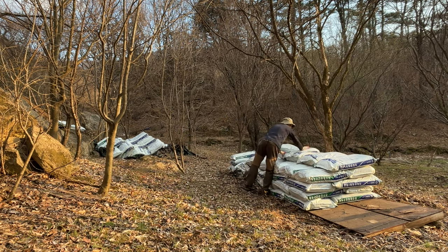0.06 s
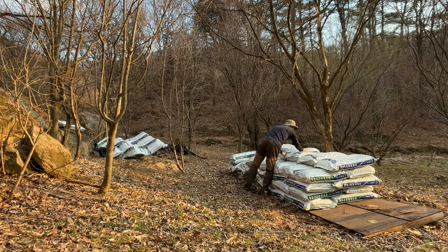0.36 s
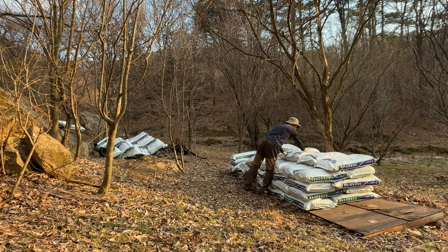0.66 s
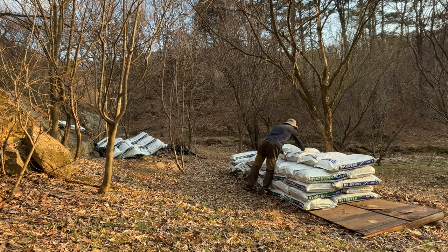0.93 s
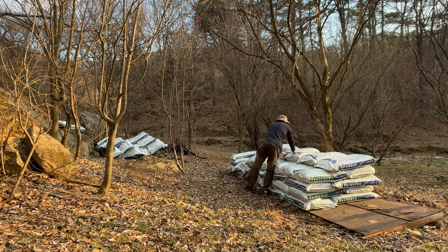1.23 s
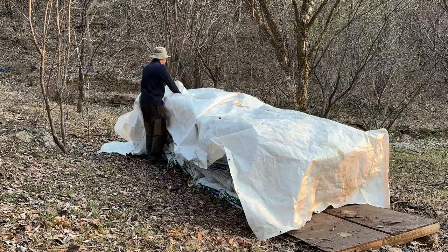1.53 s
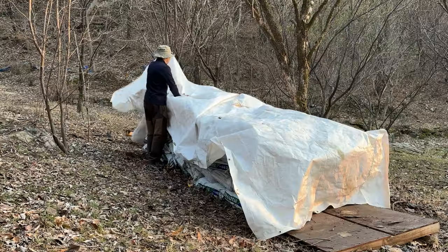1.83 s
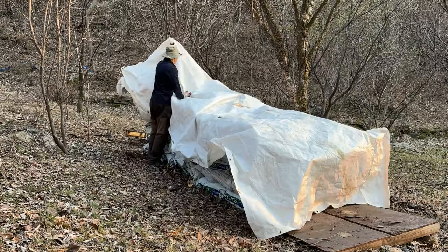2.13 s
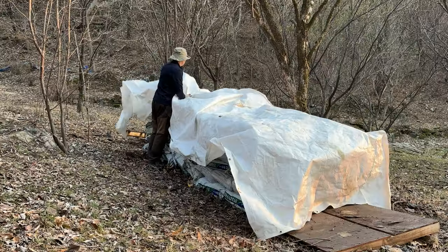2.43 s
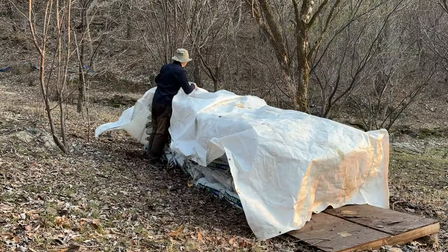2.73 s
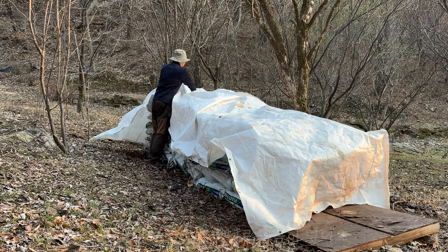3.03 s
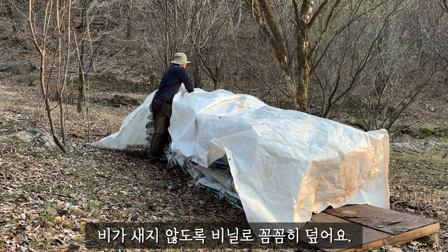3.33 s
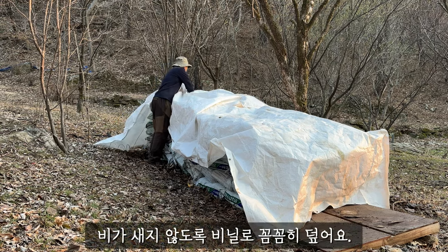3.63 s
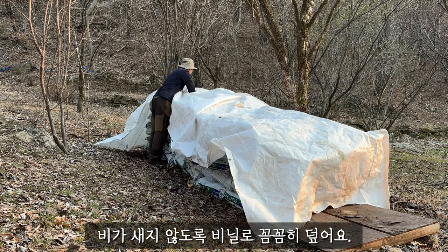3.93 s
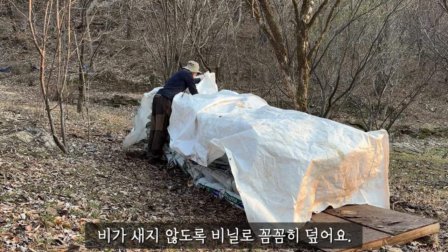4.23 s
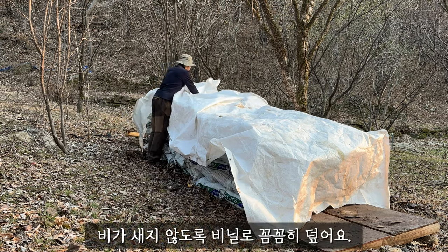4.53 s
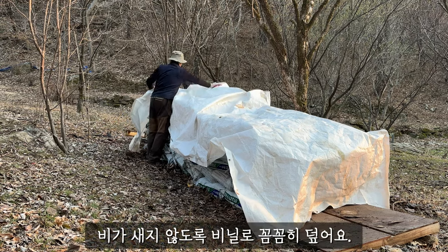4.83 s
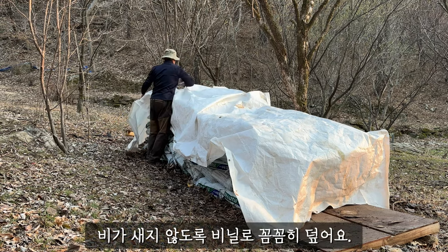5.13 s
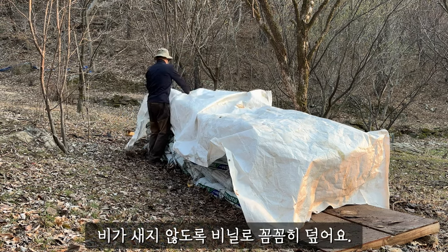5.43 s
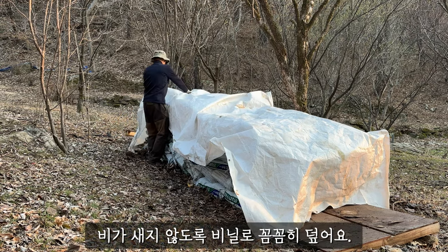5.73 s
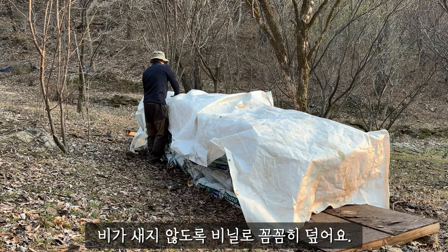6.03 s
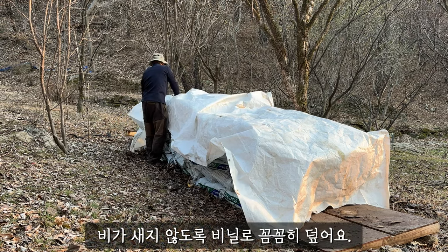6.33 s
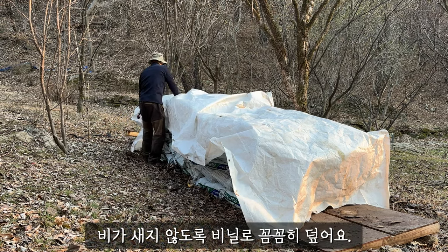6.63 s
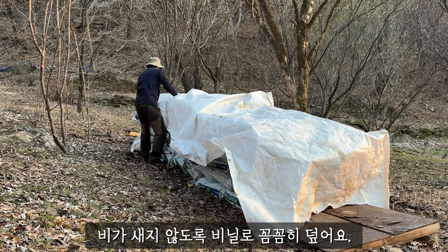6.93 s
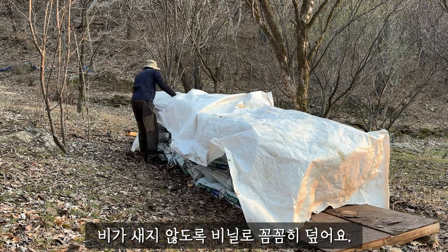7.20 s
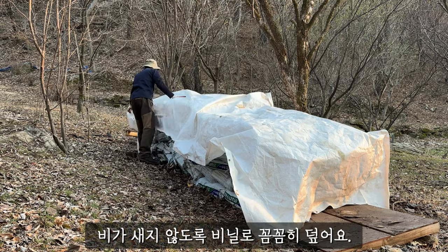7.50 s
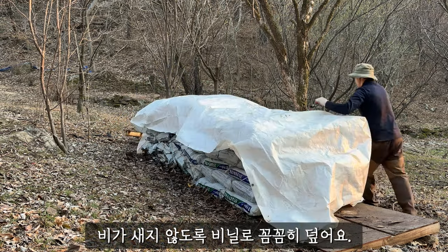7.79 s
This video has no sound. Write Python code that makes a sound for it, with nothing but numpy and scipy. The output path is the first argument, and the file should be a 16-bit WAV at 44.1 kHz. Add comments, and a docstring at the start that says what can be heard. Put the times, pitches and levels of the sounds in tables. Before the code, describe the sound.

For the first 1.5 seconds, someone shifts quietly beside a stack of plastic bags: light rubbing, soft low bumps, and small crunches and snaps of dry leaves and twigs. At 1.5 seconds the listening position changes abruptly and a large plastic sheet takes over, louder, crinkling in jerky swells as it is dragged and tucked. Folds pop, sliding plastic hisses, and slack panels billow and fall with soft thumps. Strong pulls come from about 1.8 to 2.5 seconds, with a smaller one near 3.1, then lighter rustling. More swells arrive around 4.0 to 4.3, 4.8, 5.3 to 5.6 and 6.3 seconds. A lull with scattered crackles lasts until 7.1, followed by a pull peaking near 7.5. The position shifts again at 7.8, with a last tug at 8 seconds. The sheet sounds fairly near, with faint reverberation from trees and a low, steady wash of air throughout.

```python
"""Outdoors among trees, someone shifts on dry leaves beside a stack of plastic bags, then drags and
tucks a big plastic sheet over it. Each pull buckles the film in countless small creases, makes loose
panels billow and draws a hiss from sliding friction; single folds snap through with a pop, and slack
plastic falls with a thump. The work is heard from three positions in turn, with faint reverberation
from the trees and a steady wash of air."""
import sys
import numpy as np
from scipy import signal
from scipy.fft import rfft, irfft, next_fast_len
from scipy.io import wavfile
from scipy.ndimage import uniform_filter1d

SR = 44100
rng = np.random.default_rng(int(sys.argv[2]) if len(sys.argv) > 2 else 0)


def generate_wav(sig):
    """Save sig (samples, or channels by samples) to the path in sys.argv[1] as 16-bit PCM at SR."""
    pcm = np.round(np.clip(np.atleast_2d(sig).T, -1, 1) * 32767).astype(np.int16)
    wavfile.write(sys.argv[1], SR, pcm)


N = 355278

# moments at which the second and third listening positions begin: start_s
MOVES_S = [1.503, 7.83]


def sheet():
    """Stick-slip: a slack sheet yields in jerks, which merge into an even swish under a hard pull."""
    crumple_db, edge_db, billow_db = pull_levels()
    density = np.clip(gain_of(.6 * (crumple_db + 33.5)), .16, 1)
    body, edge = crumpling(density, crumple_db, edge_db)
    slide = sliding(crumple_db)
    billow = billowing(billow_db)
    folds = flipping_folds(crumple_db)
    jerk = stick_slip(per_s=42, depth=2.2 * (1.35 - density), settle_s=.009)
    edge, slide = shifting_resonances(np.array([edge, slide]), depth_db=2.2, hold=4, frame=1024)
    return jerk * (body + jerk ** .55 * edge) + np.sqrt(jerk) * slide + billow + folds


def pull_levels():
    """Common excitation: each pull sets the dB envelopes of crumpling, its sharp edge and billowing."""
    # pulls and tucks: peak_s, rise_s, fall_s, crumple_db, sharpness_db, billow_db
    pulls = [(1.621, 0.047, 0.02, -42, -12, -39), (1.691, 0.032, 0.023, -39.5, -14, -40),
             (1.777, 0.083, 0.1, -35.5, -14, -36), (1.855, 0.039, 0.066, -35.5, -13, -37),
             (1.945, 0.066, 0.11, -34, -12.5, -38.5), (2.095, 0.13, 0.12, -35.5, -22, -36.5),
             (2.18, .05, 0.065, -41, -9, -44), (2.241, 0.031, 0.1, -29, -11, -37.5),
             (2.41, 0.27, 0.4, -39.5, -11.5, -41), (2.74, 0.056, 0.0078, -41.5, -7, -39.5),
             (2.829, 0.079, 0.037, -55, -19, -48), (2.975, 0.017, 0.043, -45, -5, -64),
             (3.064, 0.05, 0.13, -35.5, -10.5, -37), (3.281, 0.079, 0.082, -42, -10.5, -46),
             (3.386, 0.04, 0.032, -43, -8, -43), (3.57, 0.18, 0.15, -51, -15, -62),
             (3.71, 0.33, 0.46, -49.5, -10, -48.5), (3.971, 0.073, 0.08, -43, -17, -48),
             (4.071, 0.086, 0.17, -36, -8.5, -38.5), (4.14, 0.059, 0.13, -35.5, -26, -37.5),
             (4.249, 0.05, 0.095, -35, -7.5, -42.5), (4.308, 0.025, 0.044, -38, -14, -52),
             (4.39, 0.024, 0.056, -45.5, -17, -42.5), (4.469, 0.12, 0.19, -45.5, -9.5, -46.5),
             (4.68, 0.23, 0.065, -48, -6, -50), (4.821, 0.11, 0.091, -35.5, -7, -38.5),
             (5.02, 0.12, 0.077, -50.5, -6.5, -52.5), (5.156, 0.01, 0.025, -52, -9, -39),
             (5.35, 0.2, 0.19, -38, -8, -39), (5.512, 0.034, 0.077, -32.5, -7.5, -34.5),
             (5.718, 0.062, 0.074, -41.5, -12.5, -41.5), (5.821, 0.084, 0.044, -48.5, -8, -49),
             (6.0, 0.0087, 0.022, -50, -39, -50), (6.048, 0.022, 0.045, -45, -4.5, -44.5),
             (6.135, 0.045, 0.12, -44, -10, -50), (6.28, 0.018, 0.0594, -29.5, -7.5, -43),
             (6.308, 0.049, 0.043, -33, -9, -33), (6.375, 0.073, 0.032, -37.5, -8.5, -33.5),
             (6.52, 0.22, 0.043, -53.5, -23, -52), (6.921, 0.088, 0.73, -54.5, -11.5, -51),
             (7.135, 0.035, 0.047, -40, -9.5, -42), (7.207, 0.033, 0.038, -41.5, -8, -46),
             (7.295, 0.036, 0.035, -42, -10, -40), (7.362, 0.053, 0.043, -35, -12, -40.5),
             (7.452, 0.061, 0.08, -31.5, -14, -33.5), (7.54, 0.045, 0.16, -63, -3, -52),
             (7.84, 0.013, 0.025, -41.5, -23, -39.5), (7.88, 0.073, 0.036, -43.5, -12, -40.5),
             (7.977, 0.037, 0.03, -29, -12.5, -34.5)]
    peak_s, rise_s, fall_s, crumple_db, sharpness_db, billow_db = np.transpose(pulls)
    crumple = swells(peak_s, rise_s, fall_s, crumple_db, rest_db=-69.5)
    edge = swells(peak_s, rise_s, fall_s, crumple_db + sharpness_db, rest_db=-100)
    # loose panels move a little after the creases and settle more slowly
    billow = swells(peak_s + .0062, rise_s, fall_s * 1.22, billow_db)
    return crumple, edge, billow


def crumpling(density, crumple_db, edge_db):
    """Buckling creases radiate clicks over the swish of the film; gives a dull body and a sharp edge."""
    # dull crinkling, strongest near 950 Hz, with a filter notch at 10 kHz: frequency_hz, gain_db
    crinkle_filter = [(100, -29), (260, 0), (470, -4), (700, 1.1), (950, 3.5), (1400, -1), (2200, -6),
                      (3200, -13.5), (5000, -21), (7000, -21.5), (10000, -135), (15000, -47)]
    creases = buckling(density, spread_db=-.5, pitch_hz=(371, 5240), cycles=.36, lag_s=.005, count=18000)
    swish = rng.standard_normal((2, N))
    blends = np.array([creases + gain_of(-3) * swish, creases + swish])
    dull, sharp = colour(shifting_resonances(blends, depth_db=2.6, hold=6), crinkle_filter)
    dull = filtered(dull, lambda hz: rolloff(hz, corner_hz=2500, order=6))
    sharp = filtered(sharp, lambda hz: 1 - rolloff(hz, corner_hz=2500, order=6))
    body = gain_of(crumple_db - .32) * steadied(dull, band_hz=(400, 2500), window=1000)
    edge = gain_of(edge_db) * steadied(sharp, band_hz=(2500, 6000), window=1000)
    return body, edge


def buckling(density, spread_db, pitch_hz, cycles, lag_s, count):
    """Elastic instability: creases give way in avalanches of four damped pulses; (direct, scattered)."""
    when, chance, pitch, size, damping = rng.random((count, 5)).T
    lags = rng.exponential(1, (2, 4, count))
    kicks = rng.standard_normal((2, 4, count))
    lags[:, 0], kicks[:, 0] = 0, 2 * np.sign(kicks[:, 0])  # a firm first buckle sets off the others
    onset = (when * N).astype(int)
    live = chance < (density * np.ones(N))[onset]
    size = gain_of(spread_db * np.minimum(-np.log(1 - size), 3))[live]
    low_hz, high_hz = pitch_hz
    hz = low_hz * (high_hz / low_hz) ** pitch[live]
    step = np.arange(200)
    turns = hz[:, None] * step / SR
    age = turns / (cycles * (.5 + damping[live]))[:, None]
    swing = np.sin(2 * np.pi * turns) * age * np.exp(-age) * (1 - step / len(step))
    clicks = np.zeros((2, N))
    for row in range(2):
        for lag, kick in zip(lags[row][:, live], kicks[row][:, live]):
            places = (onset[live] + (lag * lag_s * SR).astype(int))[:, None] + step
            pulses = swing * (size * hz * kick * np.exp(-lag / 2))[:, None]
            clicks[row] += np.bincount(places.ravel(), pulses.ravel(), N)[:N]
    # whitened over their range, so that later filters alone set the colour
    length = next_fast_len(N, real=True)
    spectrum = rfft(clicks, length)
    power = uniform_filter1d(abs(spectrum) ** 2, size=1000)
    return irfft(spectrum * np.sqrt(N / (power + power.max() / 20)), length)[:, :N]


def flipping_folds(crumple_db, small_count=70):
    """Bistable folds flip over: big ones at set times, small ones at random, scaled by the crumpling."""
    # big folds of the sheet: start_s, ring_db, pitch_hz, crack_db, tick_db
    big_folds = [(1.671, -29, 1240, -31, -37), (1.764, -32, 1230, -40, -55), (1.928, -21, 824, -28, -33),
                 (1.941, -29, 1050, -28, -49), (1.975, -27, 850, -42, -55), (2.016, -21, 730, -26, -30),
                 (2.021, -32, 710, -20, -45), (2.029, -24, 704, -24, -44), (2.0645, -16.5, 980, -17, -22),
                 (2.233, -20, 1520, -20.5, -38), (2.248, -18.5, 730, -22, -49), (2.276, -30, 825, -29, -26),
                 (2.365, -32, 1800, -28, -55), (2.404, -17, 1675, -21.5, -57), (2.464, -24, 1080, -40, -54),
                 (2.483, -21.5, 930, -38, -52), (2.678, -26, 1090, -27, -31), (2.738, -28, 1270, -36, -48),
                 (2.784, -32, 1960, -52, -64.5), (2.823, -28, 1090, -36.5, -54),
                 (2.927, -46, 696, -47, -28.5), (2.95, -26, 2060, -32, -56), (2.996, -38, 790, -30, -32),
                 (3.014, -35, 657, -27, -55), (3.037, -20, 1850, -25, -52), (3.351, -29, 790, -29.5, -31),
                 (3.385, -26, 1020, -36, -56), (3.558, -27, 1750, -32, -54),
                 (3.784, -36.5, 670, -55, -32.5), (3.91, -27.5, 897, -60, -70), (4.04, -26, 830, -30, -50),
                 (4.069, -28, 950, -37, -47), (4.127, -20, 915, -22.5, -48), (4.186, -20, 930, -28.5, -47),
                 (4.241, -16, 794, -27, -53), (4.262, -25, 950, -28, -51), (4.301, -19, 970, -39, -56),
                 (4.392, -27, 883, -41, -60), (4.46, -19.5, 890, -47, -56), (4.496, -42, 845, -44, -32.5),
                 (4.647, -40, 1500, -34, -55), (4.696, -38, 1500, -29, -52), (4.822, -30, 830, -26, -55),
                 (4.887, -22, 1600, -35, -52), (5.04, -31.5, 1470, -36, -68), (5.143, -24.5, 960, -48, -67),
                 (5.215, -42, 875, -47, -58), (5.299, -32, 1050, -31, -37), (5.343, -18, 1030, -33, -50),
                 (5.393, -20, 2070, -43, -52), (5.493, -17, 990, -22, -46), (5.524, -13, 1205, -35, -53),
                 (5.623, -25.5, 2100, -40, -56), (5.718, -23.5, 990, -34, -52),
                 (5.726, -25, 1500, -28.5, -57), (5.841, -31, 1600, -60, -52), (6.031, -27, 1240, -39, -44),
                 (6.147, -26, 1537, -56, -57), (6.273, -16.5, 1180, -43, -35),
                 (6.305, -14, 1310, -22.5, -28), (6.316, -19, 448, -36, -52), (6.394, -24, 970, -38, -53),
                 (6.469, -35, 1180, -36, -58), (6.478, -42, 1150, -36.5, -56), (6.708, -31, 1070, -43, -59),
                 (6.875, -30.5, 1500, -40, -65), (6.903, -31, 970, -51, -67), (6.908, -32, 1510, -47, -60),
                 (6.953, -42, 1010, -52, -63), (6.992, -31, 1030, -45, -63), (7.037, -24.5, 1350, -45, -60),
                 (7.061, -34, 1180, -38, -53), (7.081, -20.5, 1200, -36, -53), (7.123, -27, 980, -30, -62),
                 (7.187, -26, 1100, -39, -58), (7.2, -23, 1160, -49, -58), (7.323, -33, 1690, -28, -48),
                 (7.442, -17, 1320, -33, -54), (7.832, -28, 720, -61, -50), (7.84, -32, 1300, -32, -35),
                 (7.938, -26, 650, -50, -46), (7.954, -30, 664, -40, -29), (7.973, -15.5, 636, -27, -54),
                 (8.032, -23, 790, -59, -66)]
    progress = (np.arange(small_count) + rng.random(small_count)) / small_count
    start_s = MOVES_S[0] + (N / SR - MOVES_S[0]) * progress
    strength, pitch = rng.standard_normal((small_count, 2)).T
    level_db = np.minimum(crumple_db[(start_s * SR).astype(int)], -40) - 2 * strength
    pitch_hz = 1150 * 2 ** (.427 * pitch)
    small_folds = np.transpose([start_s, level_db + 7, pitch_hz, level_db + 3, level_db - 12])
    return snap_through(np.vstack([big_folds, small_folds]), ring_gain_db=-7.5, after_db=-10,
                        after_t60=.063, crack_gain_db=2, crack_t60=.019, tick_gain_db=5.5, tick_t60=.006)


def snap_through(events, ring_gain_db, after_db, after_t60, crack_gain_db, crack_t60,
                 tick_gain_db, tick_t60):
    """Snap-through excites damped modes, a weak after-ring, a crack, a tick and a settling rustle."""
    # heavily damped modes of a flipping panel: pitch_ratio, level_db
    panel_modes = [(.7, -14.5), (1, -1.5), (1.7, -6)]
    # spectrum of the crack: frequency_hz, gain_db
    crack_spectrum = [(400, -10), (1200, -8), (2500, -5), (4500, -7), (6500, -10), (9000, -38),
                      (13000, -30)]
    # spectrum of the bright tick: frequency_hz, gain_db
    tick_spectrum = [(3000, -8), (6500, -34), (9000, -3), (12500, -10.5), (16000, -18)]
    rings, cracks, ticks = np.zeros((3, 2, N))
    t = np.arange(7000) / SR
    rustle = gain_of(-12) * damped(t, t60=.33)
    after_ring = gain_of(after_db) * damped(t, after_t60)
    crack_shape = gain_of(crack_gain_db) * (damped(t, crack_t60) + rustle)
    tick_shape = gain_of(tick_gain_db) * (damped(t, tick_t60) + .47 * rustle)
    ratio, mode_db = np.transpose(panel_modes)[:, :, None]
    for start_s, ring_db, pitch_hz, crack_db, tick_db in events:
        for row in range(2):
            mode_hz = pitch_hz * ratio * (1 + .1 * rng.standard_normal(ratio.shape))
            age = mode_hz * t / .85  # a flip reaches its height in 0.85 cycles
            envelope = age * np.exp(1 - age) + np.minimum(age, 1) * after_ring
            swings = envelope * np.sin(2 * np.pi * (mode_hz * t + rng.random(ratio.shape)))
            add(rings[row], start_s, (gain_of(ring_db + ring_gain_db + mode_db) * swings).sum(0))
            add(cracks[row], start_s, gain_of(crack_db) * crack_shape * rng.standard_normal(len(t)))
            add(ticks[row], start_s, gain_of(tick_db) * tick_shape * rng.standard_normal(len(t)))
    return rings + colour(cracks, crack_spectrum) + colour(ticks, tick_spectrum)


def billowing(billow_db):
    """Large loose panels displace air slowly and so radiate low-frequency noise."""
    # spectrum of the billowing: frequency_hz, gain_db
    billow_spectrum = [(20, -32), (38, -11), (58, 1), (85, -1.5), (125, 0.5), (175, -1.5), (225, -8.5),
                       (330, -7), (600, -17), (2000, -65)]
    rumble = colour(rng.standard_normal((2, N)), billow_spectrum)
    return gain_of(billow_db - .34) * steadied(rumble, band_hz=(40, 300), window=1400)


def sliding(crumple_db):
    """Sliding friction of film on film hisses with every pull and in separate slips."""
    # slips of film over film: peak_s, rise_s, fall_s, level_db
    slips = [(1.72, 0.16, 0.14, -56), (2.57, 0.091, 0.32, -62.5), (2.93, 0.015, 0.013, -56),
             (3.37, 0.043, 0.18, -60.5), (3.8, 0.012, 0.025, -56), (4.08, 0.054, 0.19, -47.5),
             (4.79, 0.24, 0.04, -57.5), (4.95, 0.11, 0.11, -66), (5.32, 0.021, 0.063, -54.5),
             (5.57, 0.12, .08, -53.5), (5.78, 0.12, 0.087, -57.5), (6.53, 0.057, 0.2, -55.5),
             (6.67, 0.043, 0.07, -56.5), (6.76, 0.033, 0.09, -55.5), (6.83, 0.018, 0.046, -55),
             (7.42, 0.31, 0.25, -56)]
    # bright, broad sliding hiss, with a narrow filter notch at 8.2 kHz: frequency_hz, gain_db
    hiss_filter = [(600, 7.5), (2200, 5.5), (3200, 5), (4500, 3.5), (7000, 13), (8200, -64), (9200, 10),
                   (10200, 7), (12000, 7), (14000, 3), (15700, -0.5)]
    drag = gain_of(-32 + .74 * crumple_db)
    slip = gain_of(swells(*np.transpose(slips)))
    hiss = colour(friction(grit_db=1.5, window=60), hiss_filter)
    return gain_of(1.5) * np.hypot(drag, slip) * steadied(hiss, band_hz=(10500, 15500), window=1500)


def thumps(gain_db, cycles):
    """Air displacement: slack plastic falls on the stack and radiates a short, low wave packet."""
    # falls of slack plastic: peak_s, level_db, pitch_hz
    falls = [(.016, -53, 317), (.207, -41, 387), (.894, -43, 298), (1.409, -46, 292), (1.755, -34, 61.7),
             (1.89, -35, 55), (1.958, -26.5, 137), (2.072, -33, 117), (2.246, -26, 150), (2.393, -28, 104),
             (2.478, -30, 116), (3.072, -31, 111), (3.537, -32.5, 176), (4.119, -27, 105),
             (4.223, -26, 85.5), (4.329, -29, 94), (5.433, -29, 118), (5.477, -32, 124), (5.856, -35, 65.6),
             (6.079, -33, 138), (7.372, -27, 143), (7.54, -33, 107), (7.888, -31.5, 118)]
    pair = np.zeros((2, N))
    for peak_s, level_db, pitch_hz in falls:
        turns = np.arange(-3, 3, pitch_hz / (cycles * SR)) * cycles
        envelope = gain_of(level_db + gain_db) * np.exp(-(turns / cycles) ** 2)
        for row in pair:
            add(row, peak_s + turns[0] / pitch_hz, envelope * np.sin(2 * np.pi * (turns + rng.random())))
    return pair


def shuffle():
    """Friction and buckling: bags rub, leaves crunch underfoot, and single pieces snap."""
    # movements beside the bags: peak_s, rise_s, fall_s, rub_db, crunch_db
    movements = [(.08, 0.17, 0.33, -51.5, -63.5), (.21, 0.028, 0.06, -46, -57),
                 (.39, 0.14, 0.11, -58, -56.5), (.49, 0.064, 0.039, -49.5, -60.5),
                 (.565, 0.023, 0.034, -43, -76), (.75, .015, 0.041, -58, -64.5),
                 (.89, 0.15, 0.1, -52.5, -66.5), (1.088, 0.0062, 0.12, -60, -62),
                 (1.21, 0.16, 0.093, -51, -65.5), (1.291, 0.025, 0.041, -46, -64.5),
                 (1.45, 0.09, 0.15, -55, -79)]
    # snapping leaves, twigs and bags: start_s, ring_db, pitch_hz, crack_db, tick_db
    snap_events = [(.054, -35, 1020, -54, -62), (.079, -35, 1120, -60, -62), (0.106, -32, 1260, -52, -62),
                   (0.147, -33, 1360, -47, -49), (0.202, -31.5, 990, -56, -55), (.211, -32, 930, -55, -58),
                   (0.221, -36.5, 415, -63, -50), (.24, -35, 1720, -47, -44), (0.338, -35, 800, -46, -38),
                   (0.375, -45, 840, -44, -41), (0.398, -38, 830, -40.5, -52), (.483, -37, 1620, -53, -62),
                   (.551, -41, 1000, -52, -52), (.56, -40, 1090, -56, -60), (0.565, -32, 910, -51, -58),
                   (.577, -37, 1800, -57, -64), (0.628, -37.5, 1080, -75, -69),
                   (0.745, -46, 1560, -47.5, -43.5), (.833, -41.5, 1150, -62, -66),
                   (0.889, -39, 756, -51.5, -47), (.917, -39, 900, -58, -62), (0.958, -35, 2340, -52, -48),
                   (1.046, -37.5, 810, -65, -70), (1.083, -36.5, 910, -43, -54),
                   (1.087, -28.5, 1730, -41, -44), (1.128, -38, 790, -44, -58),
                   (1.269, -35, 1090, -61, -60), (1.294, -37, 1240, -51.5, -55),
                   (1.404, -38, 970, -53, -53), (1.472, -38, 995, -69, -70), (1.479, -35.5, 1330, -64, -66)]
    # spectrum of rubbing bags: frequency_hz, gain_db
    bag_spectrum = [(120, 3.5), (300, -2), (600, -4), (900, 4.5), (1500, -7), (2300, -5.5), (3600, -39),
                    (10000, -37)]
    # spectrum of dry leaves: frequency_hz, gain_db
    leaf_spectrum = [(700, 4), (2000, 4), (4000, -1), (6000, -6.5), (8500, -3), (10500, -10), (12000, -4.5),
                     (15500, -11)]
    peak_s, rise_s, fall_s, rub_db, crunch_db = np.transpose(movements)
    rub = buckling(density=.94, spread_db=4.5, pitch_hz=(398, 3500), cycles=.29, lag_s=.008, count=7000)
    rub = shifting_resonances(colour(rub, bag_spectrum), depth_db=2.2, hold=6)
    rub = steadied(rub, band_hz=(400, 2500), window=1500)
    rub *= gain_of(swells(peak_s, rise_s, fall_s, rub_db, rest_db=-59) - 6)
    crunch = colour(friction(grit_db=2, window=50), leaf_spectrum)
    crunch = steadied(crunch, band_hz=(3000, 15500), window=1500)
    crunch *= gain_of(swells(peak_s, rise_s, fall_s, crunch_db, rest_db=-91) + 4)
    bumps = soft_bumps()
    snaps = snap_through(snap_events, ring_gain_db=-5, after_db=-8, after_t60=.066,
                         crack_gain_db=9, crack_t60=.071, tick_gain_db=10.5, tick_t60=.014)
    return stick_slip(per_s=35, depth=.9, settle_s=.007) * (rub + crunch) + bumps + snaps


def soft_bumps():
    """Soft impacts of bags and boots have long contact times, so their energy lies low in pitch."""
    # contacts of bags and boots: peak_s, level_db
    contacts = [(.01, -47.5), (.225, -45), (.35, -58), (.52, -50), (.62, -52), (0.718, -51.5), (.87, -48.5),
                (.95, -48.5), (1.13, -50), (1.27, -50), (1.39, -53), (1.48, -52)]
    # spectrum of a bump: frequency_hz, gain_db
    bump_spectrum = [(20, -33), (38, -15), (58, 12), (85, -7), (120, 3.5), (175, -8.5), (240, -18),
                     (400, -11), (1500, -39)]
    peak_s, level_db = np.transpose(contacts)
    envelope = gain_of(swells(peak_s, rise_s=.051, fall_s=.069, level_db=level_db))
    rumble = colour(rng.standard_normal((2, N)), bump_spectrum)
    return envelope * steadied(rumble, band_hz=(40, 300), window=2000)


def friction(grit_db, window):
    """Rough surfaces catch and slip, modulating the amplitude of a hiss; gives (direct, scattered)."""
    catches = uniform_filter1d(rng.standard_normal(N), window)
    return rng.standard_normal((2, N)) * gain_of(grit_db * catches / catches.std())


def stick_slip(per_s, depth, settle_s):
    """Relaxation after each slip: a gain that jumps at random and decays, with mean power near 1."""
    chance, size = rng.random((2, N))
    jumps = (.5 + size) * (chance < per_s / SR)
    power = 1 + depth * signal.lfilter([1], [1, -np.exp(-1 / (settle_s * SR))], jumps)
    return np.sqrt(power / uniform_filter1d(power, size=6000))


def shifting_resonances(x, depth_db, hold, frame=256):
    """Resonance follows shape: as panels deform, random peaks come and go, each for about hold frames."""
    framing = dict(nperseg=frame, noverlap=frame * 3 // 4)
    spectra = signal.stft(x, **framing)[2]
    field = rng.standard_normal(spectra.shape[-2:])
    for _ in range(2):
        field = uniform_filter1d(field, 3, axis=0)  # across frequency
        field = uniform_filter1d(field, hold, axis=1)  # along time
    gain = gain_of(depth_db * np.clip(field / field.std(), -2, 2))
    return signal.istft(spectra * gain / np.sqrt(np.mean(gain ** 2)), **framing)[1][..., :N]


def swells(peak_s, rise_s, fall_s, level_db, rest_db=-90):
    """Incoherent movements add in power, given in dB; each is 10 dB down at rise_s and fall_s away."""
    t = np.arange(0, N / SR, .002)
    since = t[:, None] - peak_s
    away = abs(since / np.where(since < 0, rise_s, fall_s))
    shape_db = -10 * away ** 1.26  # exponent 1 gives a pointed top, 2 a bell
    same_position = np.searchsorted(MOVES_S, t)[:, None] == np.searchsorted(MOVES_S, peak_s)
    power = (same_position * gain_of(level_db + shape_db) ** 2).sum(1) + gain_of(rest_db) ** 2
    return np.interp(np.arange(N) / SR, t, 10 * np.log10(power))


def microphone_ports(pair, position):
    """Phase and level differences: two ports hear direct sound plus scatter from ground and stack."""
    # phase lead of the left port at each position: frequency_hz, first_rad, second_rad, third_rad
    phase_leads = [(50, 0, 0, 0), (500, -.6, .1, -.4), (1200, -1.4, .6, -1), (2400, -2, 0, -1.5),
                   (4700, -3.8, 0, -.9), (6200, -6, 3.1, -3), (9500, -9, 3.1, -3.1),
                   (11200, -12.4, .1, -6.1), (14000, -12.6, 0, -6.5), (15300, -15.5, -3, -9.2)]
    # scattered sound by position: frequency_hz, first_db, later_db
    scatter_levels = [(60, -12, -23), (200, -8, -15), (400, -4, -11), (750, -2, -7), (1300, -3, -8),
                      (2400, -3, -10), (4400, -3, -9), (6000, -4, -9), (8000, -5, -24), (13000, -16, -21)]
    # level of the left port over the right: frequency_hz, difference_db
    balance = [(60, 1), (150, 2), (380, -.5), (1200, 2), (2400, .3), (4400, -1.2), (8000, 0)]
    direct, scattered = pair
    lead = np.array(phase_leads)[:, [0, position + 1]]
    side = colour(scattered, np.array(scatter_levels)[:, [0, min(position, 1) + 1]])
    return np.array([
        filtered(direct + sign * side,
                 lambda hz: np.exp(.5j * sign * read(lead, hz)) * gain_of(sign * read(balance, hz) / 2))
        for sign in (1, -1)])


def tree_reverberation(x, t60, delay_s):
    """Diffuse reflection: the trees return a dull, exponentially dying tail to each channel."""
    dull = filtered(x, lambda hz: rolloff(hz, corner_hz=3000, order=2))
    t = np.arange(SR // 2) / SR
    tails = rng.standard_normal((2, len(t))) * damped(t, t60) * (t > delay_s)
    return np.array([signal.oaconvolve(dull, tail / np.linalg.norm(tail))[:N] for tail in tails])


def air(level_db):
    """Ambient noise: the steady wash of open woodland, partly coherent between the channels."""
    # spectrum of the woodland air: frequency_hz, gain_db
    air_spectrum = [(20, -6), (55, 13), (120, -4.5), (250, 2), (900, -15), (2000, -29), (4000, -70),
                    (15000, -77)]
    shared, left, right = colour(rng.standard_normal((3, N)), air_spectrum)
    wash = np.array([shared + .5 * left, shared + .5 * right])
    return gain_of(level_db) * wash / wash.std()


def level_dip(depth_db, recovery_s):
    """Exponential recovery: the level dips briefly as the second position begins."""
    since = np.arange(N) / SR - MOVES_S[0]
    return gain_of(depth_db * (since > 0) * np.exp(-abs(since) / recovery_s))


def damped(t, t60):
    """Exponential damping by 60 dB in t60 seconds."""
    return gain_of(-60 * t / t60)


def rolloff(hz, corner_hz, order):
    """Low-pass response with half amplitude at the corner."""
    return 1 / (1 + (hz / corner_hz) ** order)


def gain_of(db):
    """Decibels to a factor."""
    return 10 ** (np.asarray(db) / 20)


def read(points, hz):
    """A spectrum table on a log-frequency axis."""
    f, value = np.transpose(points)
    return np.interp(np.log(hz + 1), np.log(f + 1), value)


def filtered(x, response):
    """Applies a frequency response given as a function of Hz."""
    size = next_fast_len(N + 4096, real=True)
    return irfft(rfft(x, size) * response(np.fft.rfftfreq(size, 1 / SR)), size)[..., :N]


def colour(x, points):
    """Gives x the spectrum of a table."""
    return filtered(x, lambda hz: gain_of(read(points, hz)))


def steadied(pair, band_hz, window):
    """Normalises a (direct, scattered) pair by the direct part's in-band RMS over window samples."""
    in_band = filtered(pair[0], lambda hz: (hz > band_hz[0]) & (hz < band_hz[1]))
    power = uniform_filter1d(uniform_filter1d(in_band ** 2, window), window)
    return pair / np.sqrt(abs(power) + np.mean(in_band ** 2) / 1000)


def add(mix, s, sound):
    """Mixes a sound in at a time."""
    part = mix[max(round(s * SR), 0):][:len(sound)]
    part += sound[:len(part)]


def scene():
    """Superposition: the shuffle from one position, then the sheet from two, with trees and air."""
    position = np.searchsorted(MOVES_S, np.arange(N) / SR)
    plastic = sheet()
    thuds = thumps(gain_db=-2.5, cycles=.97)
    # each source is a (direct, scattered) pair
    pairs = [(source + thuds) * (position == k) for k, source in enumerate([shuffle(), plastic, plastic])]
    near = sum(microphone_ports(pair, k) for k, pair in enumerate(pairs))
    trees = gain_of(-21) * tree_reverberation(sum(pairs)[0], t60=.97, delay_s=.0057)
    return level_dip(depth_db=-27, recovery_s=.01) * (near + trees + air(level_db=-58))


def record(dry):
    """Band limiting: the microphone's low cut, then a steep treble cut."""
    low_cut_hz, high_cut_hz = 44, 15900
    low_cut = signal.butter(2, low_cut_hz, "highpass", fs=SR, output="sos")
    high_cut = signal.firwin(511, high_cut_hz, window=("kaiser", 9), fs=SR)
    return signal.oaconvolve(signal.sosfilt(low_cut, dry), high_cut[None], "same")


dry = scene()
out = record(dry)
generate_wav(out)
```